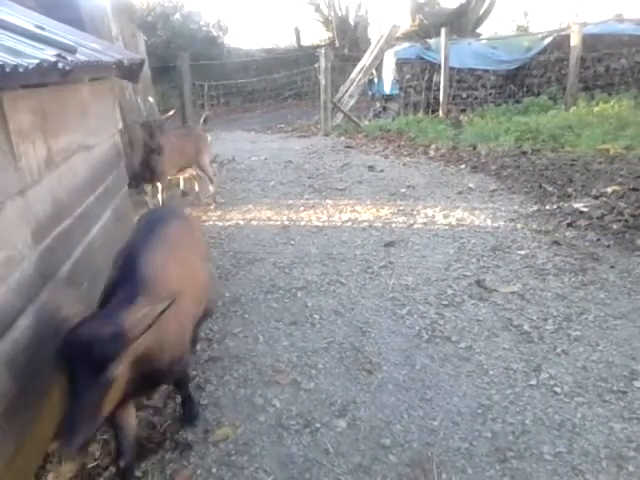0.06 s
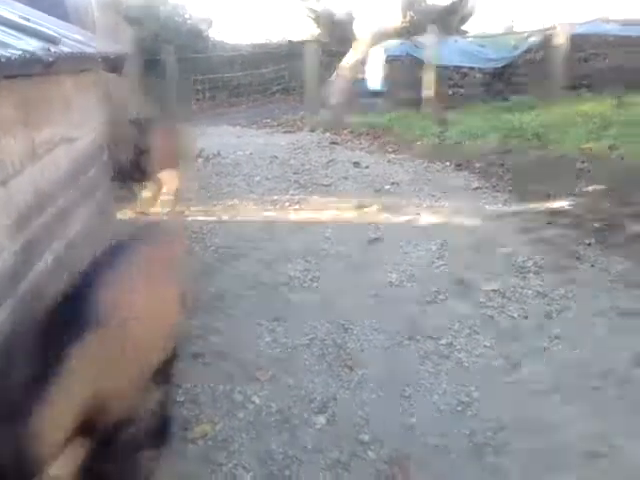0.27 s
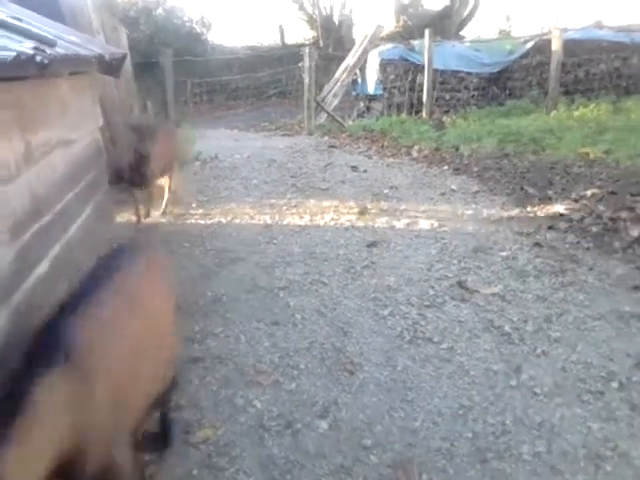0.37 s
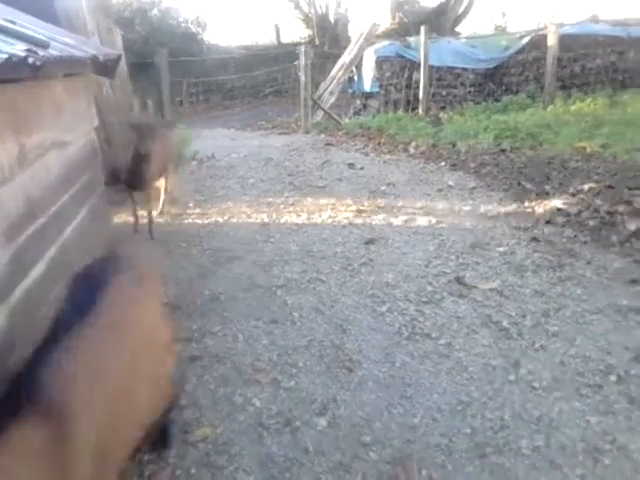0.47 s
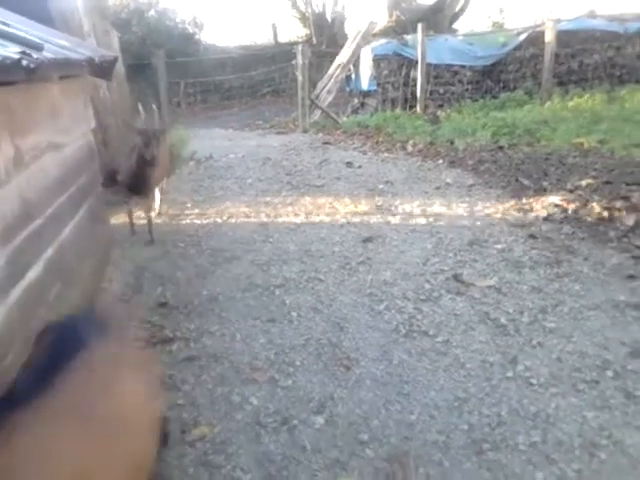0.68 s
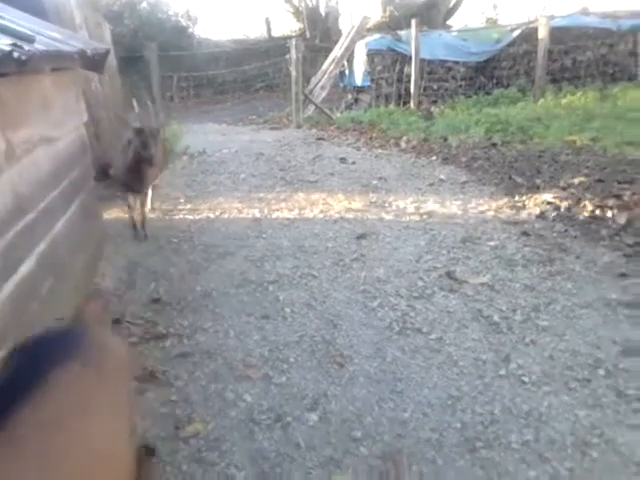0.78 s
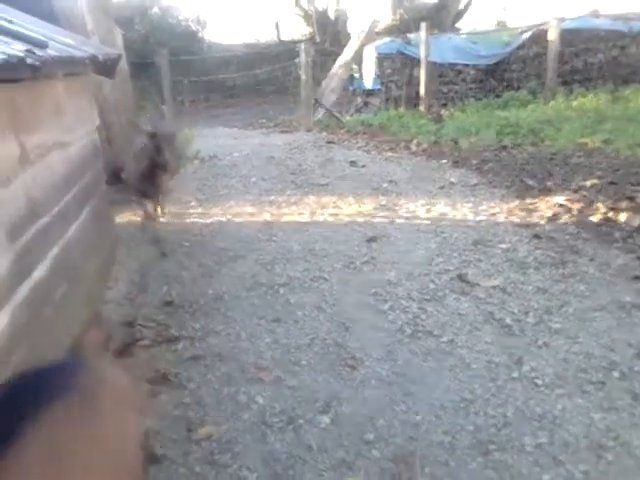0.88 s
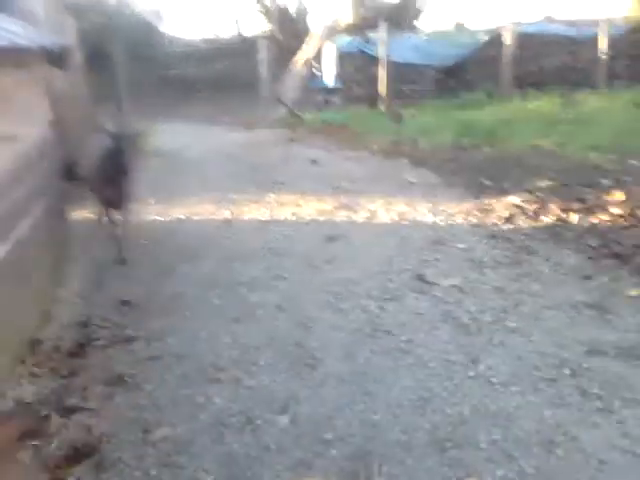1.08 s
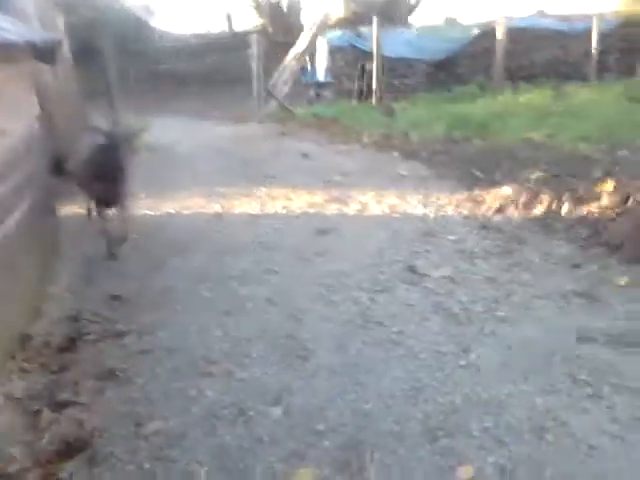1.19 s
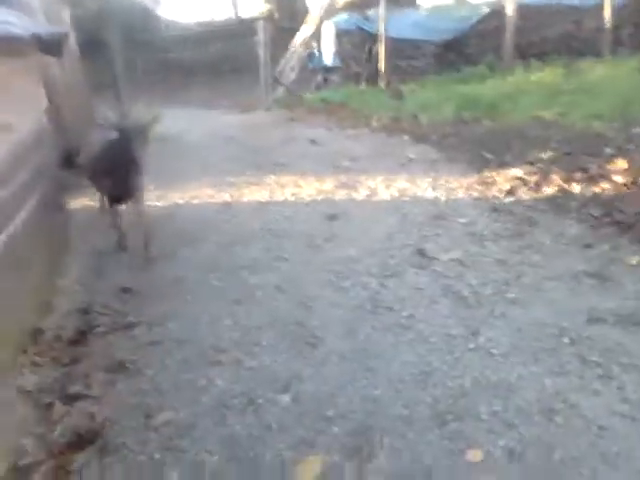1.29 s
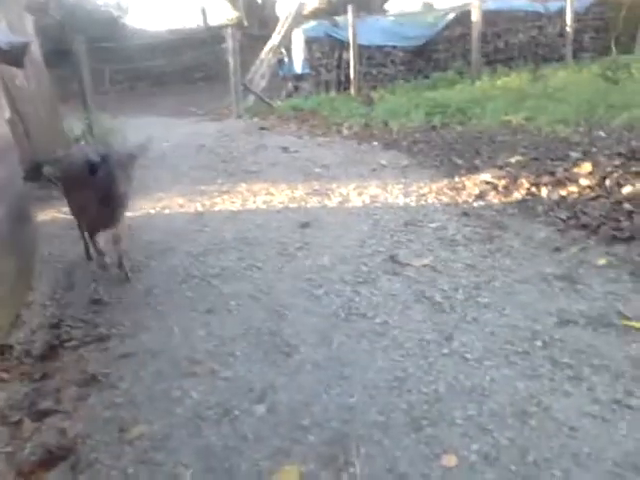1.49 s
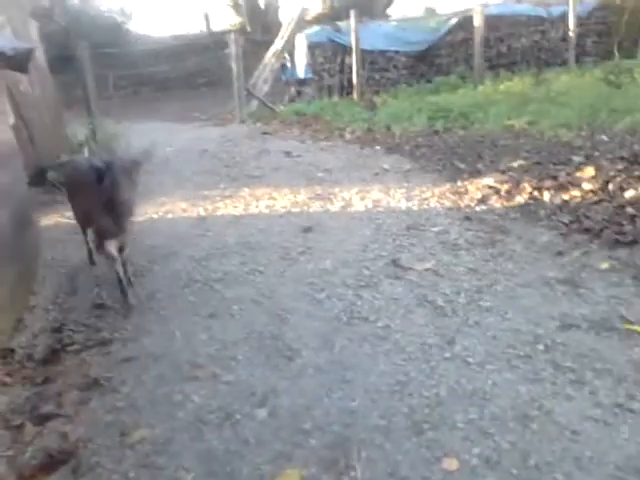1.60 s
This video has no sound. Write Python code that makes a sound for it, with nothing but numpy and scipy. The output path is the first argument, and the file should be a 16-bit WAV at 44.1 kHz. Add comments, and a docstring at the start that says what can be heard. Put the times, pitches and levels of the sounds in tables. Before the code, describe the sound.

Hooves crunch unevenly on gravel as goats walk past close by, with soft thuds and small stones snapping and ringing throughout. At about 0.35 seconds something metal is knocked twice and rings briefly. The crunching eases around 0.7 seconds, picks up again, and a kicked stone clacks at about 1 second. Lighter steps continue to around 1.6 seconds, over faint outdoor air and a low hum.

```python
"""Gravel crunches close to the microphone as goats walk past on a track beside a wall.
Each hoof presses grit, pebbles and earth together, and the goats' weight lands in soft thuds.
Single stones slip, snap and ring; something metallic is knocked, and a large kicked stone clacks.
A faint low hum lies under the open air. The sound sits in the centre; only the treble has width."""
import sys
import numpy as np
from scipy import signal
from scipy.fft import rfft, irfft
from scipy.io import wavfile
from scipy.ndimage import uniform_filter1d

SR = 44100
rng = np.random.default_rng(int(sys.argv[2]) if len(sys.argv) > 2 else 0)


def transcribe(u):
    """Save the signal u as a 16-bit wav file named by the first command-line argument.

    u: samples, shape (n,) or (channels, n), limited to [-1, 1]; the rate is SR.
    q: integer samples, one column per channel.
    """
    v = np.clip(np.atleast_2d(u).T, -1, 1)
    q = np.round(v * 32767).astype(np.int16)
    wavfile.write(sys.argv[1], SR, q)


N = 72765
T = np.arange(N) / SR

# hooves press and roll on the gravel:
# (time [s], rise [s], hold [s], t60 [s], earth level [dB], pebble level [dB], grit level [dB])
HOOF_PRESSES = [ (-.02, 0.0061, 0.0062, 0.07, -47, -49, -47.5), (0.066, .006, .026, 0.15, -51, -41.5, -42),
                (0.11, 0.0094, 0.0059, 0.14, -49.5, -54, -47),
                (0.172, 0.022, 0.01, 0.17, -41.5, -52, -50.5), (0.228, 0.016, 0.012, 0.067, -46, -29, -41),
                (0.257, 0.026, 0.034, 0.047, -45, -42.5, -37.5),
                (0.322, 0.031, 0.0055, 0.11, -38, -24, -31), (0.371, 0.012, 0.016, 0.16, -43, -28, -33),
                (0.429, 0.0085, 0.0044, 0.1, -50, -42, -47.5),
                (0.475, 0.011, 0.017, 0.14, -44.5, -36.5, -32),
                (0.518, 0.0069, 0.0055, 0.34, -50.5, -40, -41), (0.574, .04, 0.017, 0.14, -57, -68, -40),
                (0.617, 0.012, 0.0028, 0.057, -42.5, -35, -54),
                (0.65, 0.027, 0.01, 0.16, -56.5, -49, -45.5),
                (0.782, 0.0049, 0.021, 0.13, -62.5, -50.5, -43.5),
                (0.821, .003, 0.031, 0.3, -52.5, -32.5, -40), (.846, .011, 0.0046, 0.044, -43, -29, -25),
                (0.878, 0.0082, 0.0055, 0.22, -49, -36.5, -33.5),
                (0.956, 0.0027, 0.0015, 0.031, -39.5, -46, -40),
                (0.973, 0.018, 0.0093, 0.075, -43.5, -30, -30.5),
                (1.009, 0.0057, 0.0022, 0.068, -48, -30.5, -60),
                (1.026, 0.0068, 0.0091, 0.039, -44, -20, -27.5),
                (1.062, .006, 0.0054, 0.12, -45.5, -39, -41.5),
                (1.143, 0.027, 0.0044, 0.075, -51, -37, -37.5),
                (1.178, 0.037, 0.011, 0.18, -51.5, -43, -40.5), (1.256, .006, 0.0054, 0.11, -62, -54, -41),
                (1.35, 0.01, 0.0091, 0.1, -49, -45.5, -27), (1.385, 0.021, .015, 0.15, -53, -43, -40),
                (1.49, 0.0017, .01, 0.14, -79, -54, -48), (1.52, .004, 0.011, 0.23, -53, -45.5, -46.5),
                (1.549, 0.017, 0.1, .2, -50.5, -45, -43)]
# spectra of the track's three grain sizes: (frequency [Hz], relative level [dB])
EARTH_SPECTRUM = [(40, -48), (110, -2), (220, -6), (380, -1), (700, -2.5), (1150, -2), (1700, -3),
                  (3000, -10.5)]
PEBBLE_SPECTRUM = [(500, -44.5), (1000, -10.5), (1600, -5), (2300, 5), (3200, 5.5), (4800, 5), (6500, 4.5),
                   (9000, 7), (15000, -50)]
GRIT_SPECTRUM = [(1500, -29), (4000, -10), (6500, -11.5), (7600, -1.5), (9000, 9.5), (10300, 5.5),
                 (11500, 0), (14000, -9.5), (16000, -71)]
# single stones slip: (time [s], length [s], tick level [dB], knock level [dB], knock pitch [Hz])
STONE_SLIPS = [ (0.236, 0.0037, -23.5, -47, 3280), (0.3178, 0.00051, -13, -39, 5200),
               (0.3212, 0.0027, -29, -41, 5000), (0.341, 0.0065, -15.5, -22, 3340),
               (.382, 0.0055, -19, -30, 3800), (0.4788, 0.0031, -26, -43, 2950),
               (.489, 0.0069, -24, -32.5, 2960), (0.527, 0.0056, -33, -34, 2730),
               (0.5808, .0016, -26, -39, 4640), (0.587, 0.0012, -27.5, -56, 4960),
               (0.6138, 0.0013, -18.5, -29, 2320), (0.62, 0.016, -30.5, -29, 6400),
               (0.8195, 0.0031, -17.5, -24.5, 3150), (0.99, 0.00083, -20, -38, 4900),
               (1.0825, 0.0014, -34, -52, 4000), (1.168, 0.0045, -33, -31.5, 5400),
               (1.352, 0.0019, -37, -58, 3540), (1.3624, 0.0023, -23.5, -57, 3500),
               (1.365, 0.02, -33, -31, 3630), (1.403, 0.0038, -31.5, -34.5, 3330),
               (1.5229, 0.0014, -36, -24.5, 2430), (1.5237, 0.0024, -57, -24.5, 3490),
               (1.547, 0.00076, -46, -31, 2490), (1.61, 0.008, -58, -32, 4350)]
# a goat's weight lands: (time [s], level [dB], final pitch [Hz], extra pitch at the start [ratio])
FOOTFALLS = [(0.07, -29, 139, 2.05), (.186, -32, 199, 0.68), (.243, -32, 220, 0.82),
             (.403, -38.5, 280, 0.25), (.479, -39, 269, .2), (.498, -33.5, 212, .2),
             (.622, -26.5, 327, 0.033), (.625, -25, 162, 0.47), (.688, -40.5, 220, 0.15),
             (.853, -36.5, 346, 0.9), (.958, -43.5, 428, 0.46), (0.989, -44, 196, 0.18),
             (1.215, -39.5, 423, .2), (1.226, -31, 150, 0.32), (1.385, -37.5, 228, 0.14),
             (1.494, -34.5, 180, 0.72), (1.621, -32, 133, 0.96)]
# knocks on the metal thing: (time [s], level [dB])
METAL_HITS = [(0.3447, -1), (0.386, -9.5)]
# modes of the metal thing and the large stone: (frequency [Hz], level [dB], t60 [s])
METAL_MODES = [(1128, -35.5, 0.33), (1150, -37.5, 0.58), (1354, -31.5, 0.2), (1630, -21, 0.11),
               (1676, -31.5, 0.29), (1757, -28.5, .14), (1991, -21.5, 0.075), (2326, -46, 0.11),
               (2800, -41.5, 0.37), (3020, -20.5, 0.075), (3560, -37, 0.32), (3910, -28.5, 0.13),
               (4100, -47, 0.11), (4920, -30.5, 0.2), (4910, -24.5, 0.097), (5655, -22, 0.067),
               (9300, -34, .11)]
STONE_MODES = [(2630, -16.5, 0.068), (2675, -10.5, 0.031), (3060, -25.5, 0.08), (3800, -25, 0.07),
               (4020, -23, 0.035), (4880, -17, 0.018), (5400, -46, 0.019), (5900, -54.5, .045)]
# loosened stones ring: (time [s], pitch [Hz], level [dB], t60 [s])
LOOSE_STONES = [(.236, 2008, -32, 0.083), (0.486, 2920, -30, .04), (0.582, 4600, -36, 0.015),
                (0.6821, 3200, -29.5, 0.0095), (.738, 3150, -60, .03), (.856, 1037, -48.5, 0.6),
                (0.887, 2239, -35, 0.061), (0.886, 3720, -31.5, 0.14), (.986, 1655, -37, 0.28),
                (.987, 4900, -33, 0.055), (1.011, 1864, -27, .03), (1.034, 931, -43, .2),
                (1.158, 1947, -29, 0.059), (1.159, 2353, -31, 0.047), (1.159, 1005, -41, .15)]
# open air over the track: (frequency [Hz], relative level [dB])
AIR_SPECTRUM = [(20, -7), (45, 0), (90, -15), (200, -17), (500, -32), (1500, -30), (5000, -33),
                (9000, -21.5), (15000, -33)]


def hoof_crunches():
    """Close to the microphone, each press of a hoof sets earth, pebbles and fine grit moving."""
    earth = grains(EARTH_SPECTRUM, per_s=9000, spread_db=1.5, cycles=9.4)
    pebbles = grains(PEBBLE_SPECTRUM, per_s=9000, spread_db=2.5, cycles=77)
    grit = grains(GRIT_SPECTRUM, per_s=7000, spread_db=0.0, cycles=26)
    out = np.zeros(N)
    for start, rise, hold, t60, earth_db, pebble_db, grit_db in HOOF_PRESSES:
        gravel = from_db(earth_db) * earth + from_db(pebble_db) * pebbles + from_db(grit_db) * grit
        out += envelope(start, rise, hold, t60) * gravel
    return out


def grains(spectrum, per_s, spread_db, cycles, count=48):
    """Grains touch at random; each touch rings for some cycles at one of many pitches."""
    pitches = np.geomspace(spectrum[0][0], spectrum[-1][0], count)
    sizes = from_db(spread_db * np.minimum(rng.exponential(1, N), 4)) * rng.choice([-1, 1], N)
    touches = sizes * (rng.random(N) < per_s / SR)
    pitch_index = rng.integers(0, count, N)
    rings = sum(resonate(touches * (pitch_index == k), hz, 2 * hz / cycles) / np.sqrt(hz)
                for k, hz in enumerate(pitches))
    return colour(rings, spectrum)


def stone_snaps():
    """A stone slips underfoot: a bright tick and a broader crack over a knock at its own pitch."""
    out = np.zeros(N)
    for start, length, tick_db, knock_db, knock_hz in STONE_SLIPS:
        slip = envelope(start, rise=length / 2, hold=length / 4, t60=3.1 * length)
        slip_rms = np.sqrt(np.mean(slip ** 2))
        tick, crack, knock = (8980, 2060, tick_db), (7860, 2700, tick_db - 6), (knock_hz, 910, knock_db)
        for hz, width_hz, db in (tick, crack, knock):
            friction = slip * rng.standard_normal(N)
            burst = resonate(friction, hz, width_hz, 2 * width_hz)
            out += from_db(db) * slip_rms * unit_rms(burst)
    return out


def hoof_thuds():
    """A few low cycles in the ground, sagging in pitch as the hoof settles."""
    sag_s = 0.0045
    out = np.zeros(N)
    for start, db, hz, sag in FOOTFALLS:
        pitch = hz * (1 + sag * np.exp(-np.maximum(T - start, 0) / sag_s))
        phase = 2 * np.pi * np.cumsum(pitch * (T > start)) / SR
        out += from_db(db) * envelope(start, rise=0.0028, hold=0.002, t60=0.043) * np.sin(phase)
    return out


def metal_clank():
    """A metal thing is knocked twice and rings until a touch damps it."""
    touch_s, damping_db_per_s = 0.478, 351
    damping = from_db(-damping_db_per_s * np.maximum(T - touch_s, 0))
    return struck(METAL_MODES, METAL_HITS, rise=0.0029) * damping


def stone_clack():
    """A large stone is kicked and rings through a short skid."""
    kick_s, skid_s = 1.0298, 0.0061
    return struck(STONE_MODES, [(kick_s, 0)], rise=skid_s / 2, hold=skid_s / 2)


def stone_pings():
    """Loosened stones ring at one pitch each."""
    return sum(struck([(hz, db, t60)], [(start, 0)], rise=0.0014) for start, hz, db, t60 in LOOSE_STONES)


def struck(modes, hits, rise, hold=0):
    """A body's modes build up during each contact, then ring out."""
    out = np.zeros(N)
    for hz, db, t60 in modes:
        ring = sum(from_db(db + hit_db) * envelope(start, rise, hold, t60) for start, hit_db in hits)
        out += ring * np.sin(2 * np.pi * (hz * T + rng.random()))
    return out


def background(steps):
    """Steady open air; under it an unsteady low hum and a rumble of soil swell with the steps."""
    hum_hz, hum_width_hz, soil_hz, soil_width_hz, lag_s = 60.8, 26.5, 220, 170, 0.012
    step_level = np.abs(uniform_filter1d(np.abs(steps), size=1400))
    swell = np.interp(T - lag_s, T, step_level) ** 0.32
    hum_noise = rng.standard_normal(2 * N)  # the first half lets the resonance settle
    hum = resonate(hum_noise, hum_hz, hum_width_hz, 2 * hum_width_hz, 2 * hum_width_hz)[N:]
    soil = resonate(rng.standard_normal(N), soil_hz, soil_width_hz, soil_width_hz)
    air = colour(rng.standard_normal(N), AIR_SPECTRUM)
    return from_db(-52.5) * unit_rms(hum * swell) + from_db(-60) * unit_rms(soil * swell) + from_db(-61) * air


def from_db(db):
    """Decibels to gain."""
    return 10 ** (np.asarray(db) / 20)


def unit_rms(x):
    """Scale to unit power."""
    return x / np.sqrt(np.mean(x ** 2) + 1e-20)


def colour(x, spectrum):
    """Shape a steady sound by a spectrum, at unit power."""
    hz, db = np.transpose(spectrum)
    bins = np.maximum(np.fft.rfftfreq(N, 1 / SR), 1)
    gain = from_db(np.interp(np.log(bins), np.log(hz), db))
    return unit_rms(irfft(rfft(x) * gain, N))


def resonate(x, hz, *widths_hz):
    """Resonances in series at one pitch, one per width, each with unit gain at its peak."""
    for width_hz in widths_hz:
        r = np.exp(-np.pi * width_hz / SR)
        feedback = [1, -2 * r * np.cos(2 * np.pi * hz / SR), r * r]
        x = signal.lfilter(np.array([1, 0, -1]) * (1 - r * r) / 2, feedback, x + 1e-18)
    return x


def envelope(start, rise, hold, t60):
    """Straight rise, hold, exponential fade."""
    age = T - start
    return np.clip(age / rise, 0, 1) * from_db(-60 * np.clip(age - rise - hold, 0, 2 * t60) / t60)


def scene():
    """Hooves close by in the open air, centred; the treble flickers between left and right."""
    steps = hoof_crunches() + stone_snaps() + metal_clank() + stone_pings() + stone_clack()
    mid = steps + hoof_thuds() + background(steps)
    treble = signal.butter(6, 7600, "high", fs=SR, output="sos")
    wander = signal.sosfilt(signal.butter(2, 250, fs=SR, output="sos"), rng.standard_normal(N))
    pan = unit_rms(np.tanh(unit_rms(wander)))
    side = from_db(-10) * signal.sosfilt(treble, pan * mid)
    return np.array([mid + side, mid - side])


def record(dry):
    """The microphone's signal is cut steeply above 14.6 kHz."""
    return signal.sosfilt(signal.ellip(10, .2, 70, 14600, fs=SR, output="sos"), dry)


dry = scene()
out = record(dry)
transcribe(out)
```